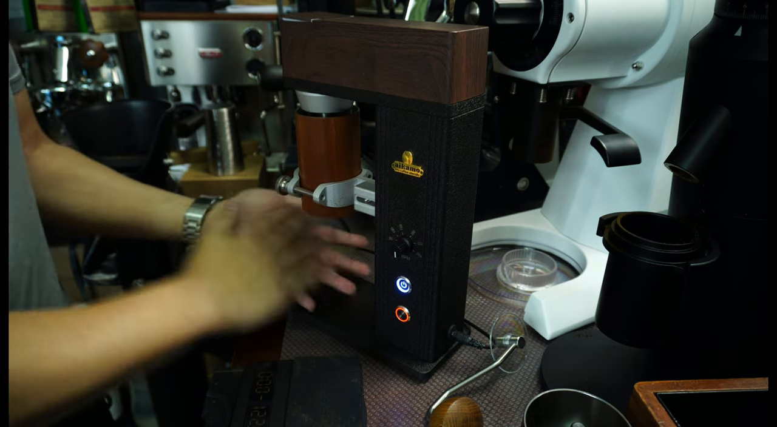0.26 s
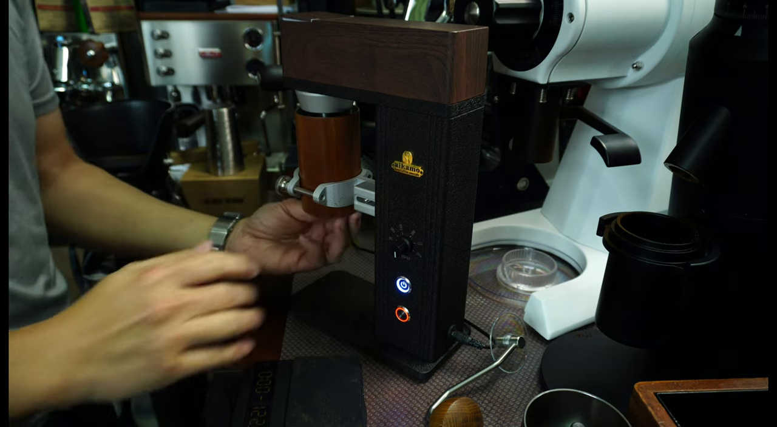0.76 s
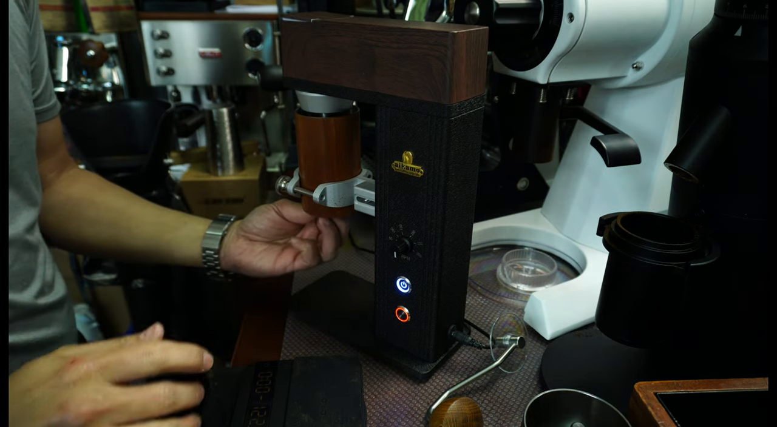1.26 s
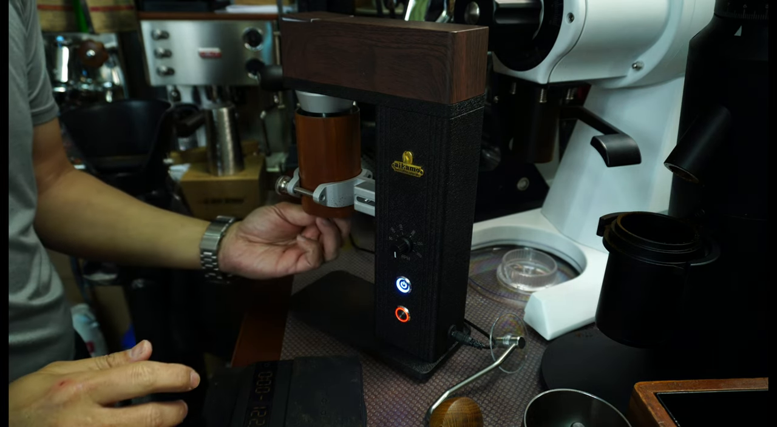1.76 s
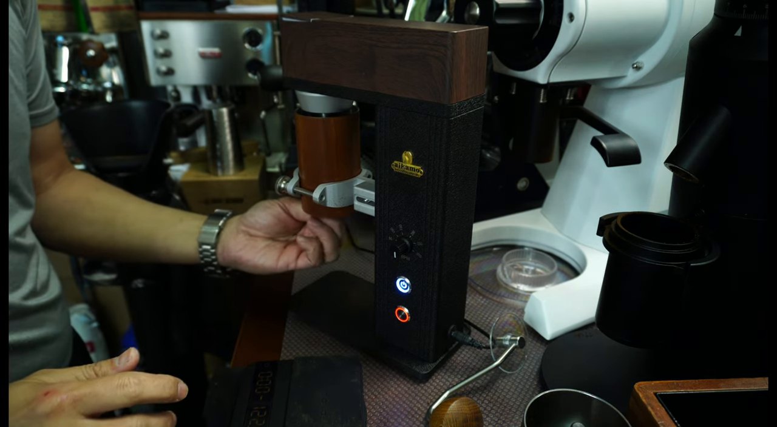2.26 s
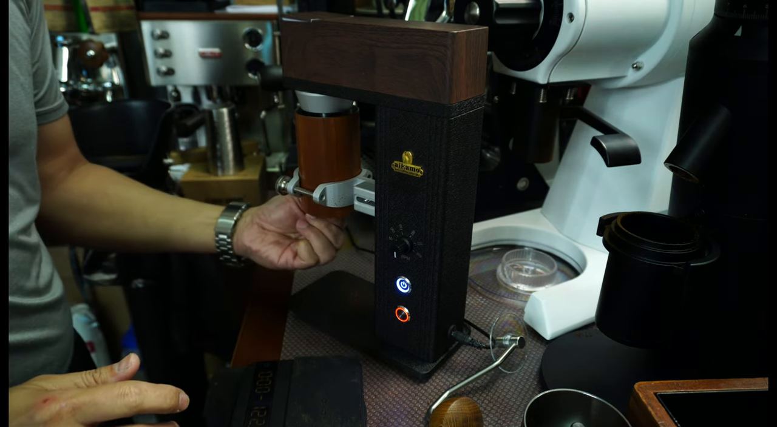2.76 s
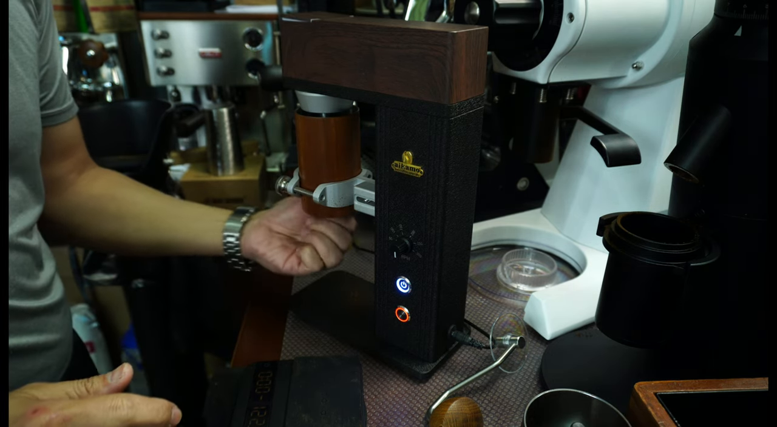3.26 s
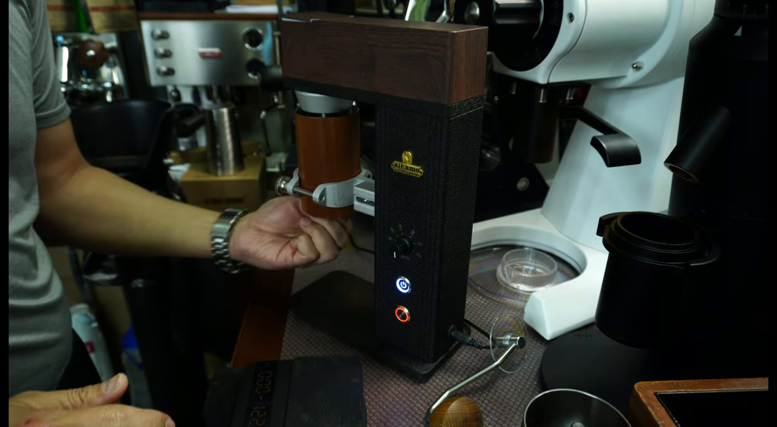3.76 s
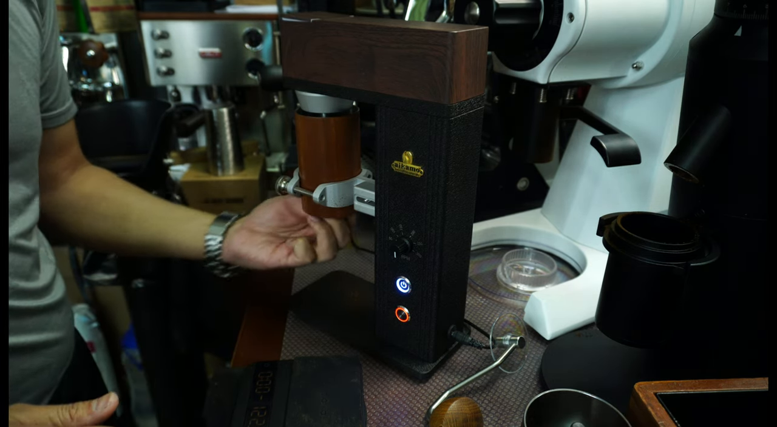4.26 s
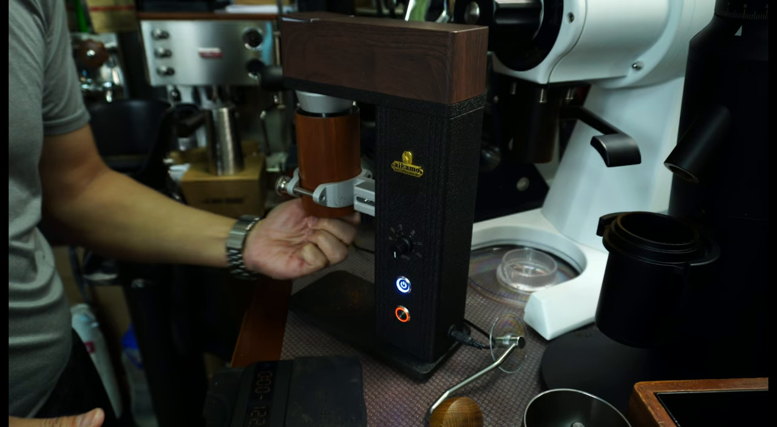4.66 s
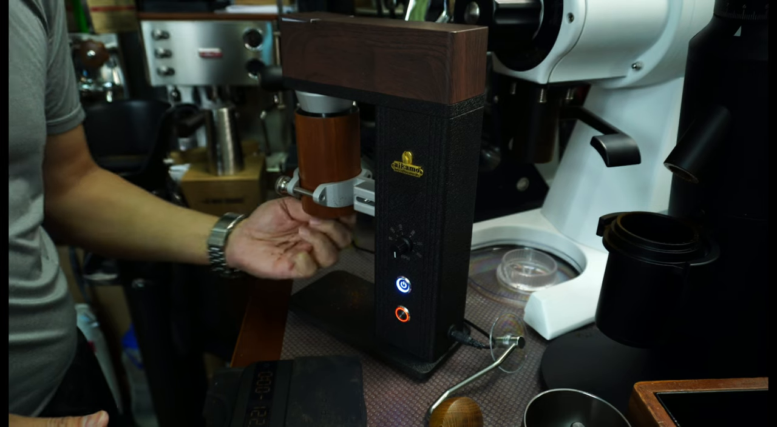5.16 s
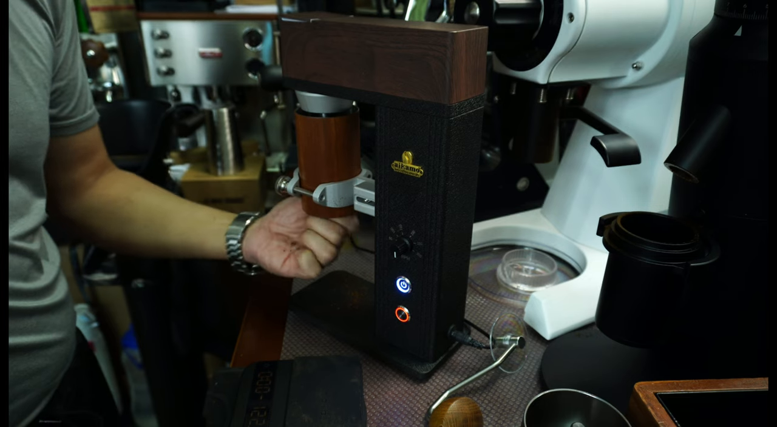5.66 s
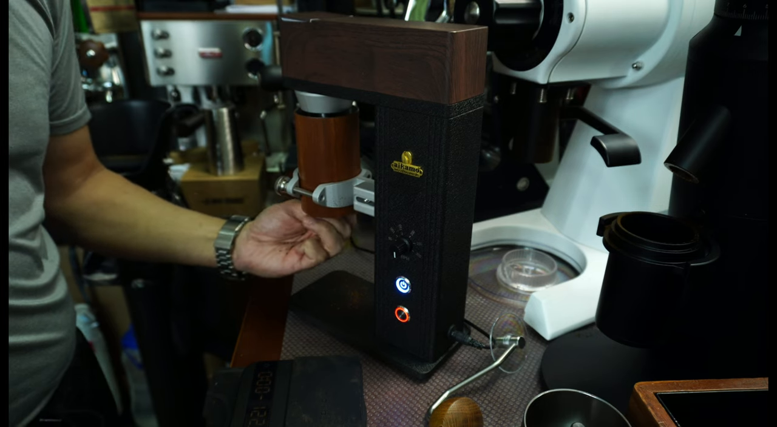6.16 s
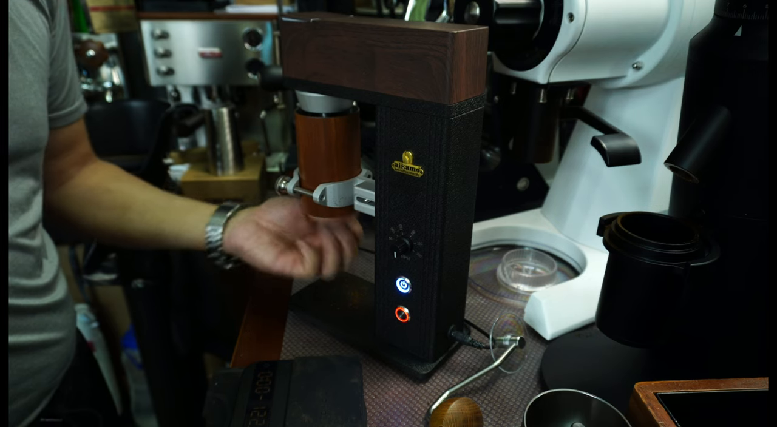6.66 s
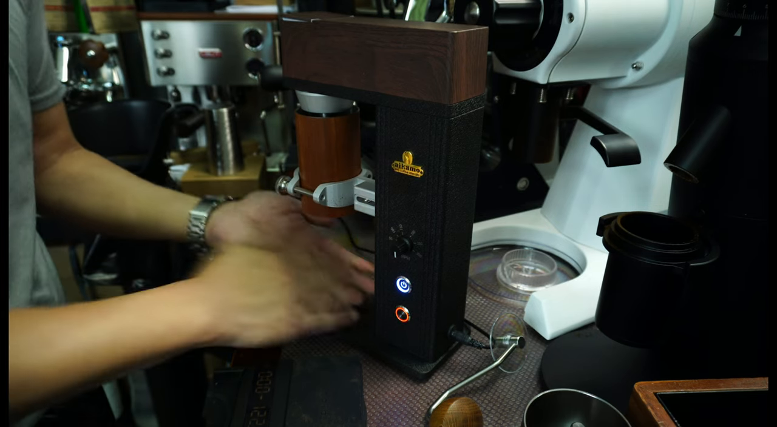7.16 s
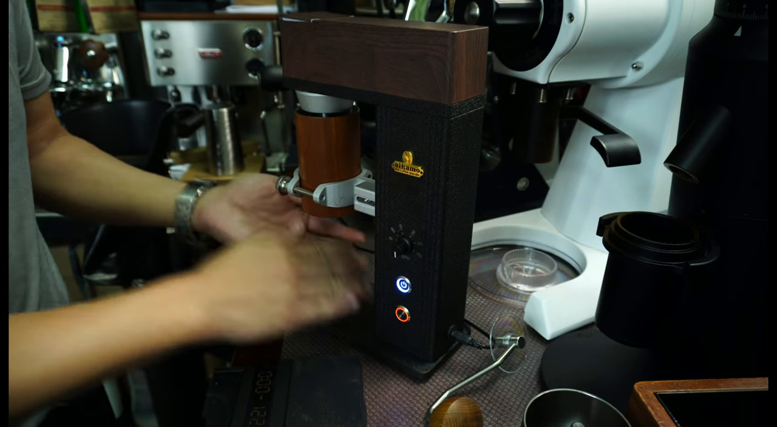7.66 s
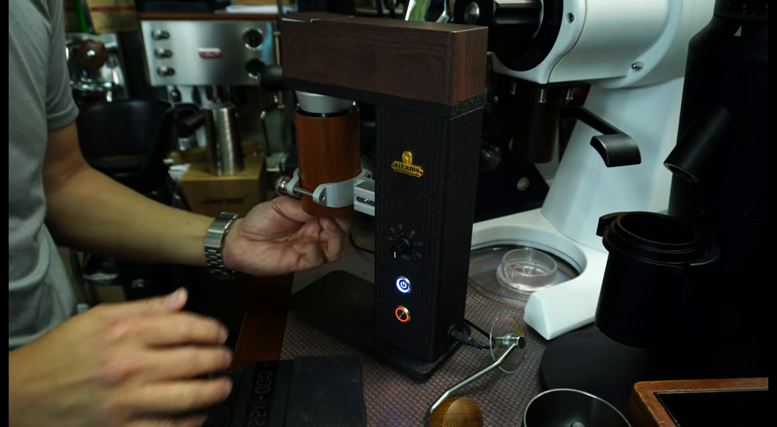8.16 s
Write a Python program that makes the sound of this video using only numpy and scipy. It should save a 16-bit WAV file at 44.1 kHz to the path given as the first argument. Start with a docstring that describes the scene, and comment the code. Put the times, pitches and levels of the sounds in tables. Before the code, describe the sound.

A hand turns the small steel adjustment wheel of a coffee grinder, making a run of sharp, uneven clicks, some bright and ringing, others muffled. The clicking pauses for a dull rustle, a few soft brush strokes and a short hissy tick, then resumes in a longer run with faint rubbing. The sound is close, in a small room with low background hiss.

```python
"""Adjusting a coffee grinder

A hand turns the small steel adjustment wheel on a cluttered counter. Each detent is an impact that excites
the modes of wheel and housing, bright when free, muffled when the fingers damp it; the small room answers.
Fingers tick on the metal. A pause holds a dull rustle, a few brush strokes and one short hissy tick; later
the turning wheel rubs faintly. Room tone lies beneath, and the sound drops out five times a second."""
import sys
import numpy as np
from scipy import signal
from scipy.fft import rfft, irfft, next_fast_len
from scipy.io import wavfile
from scipy.ndimage import uniform_filter1d, map_coordinates

SR = 44100
rng = np.random.default_rng(int(sys.argv[2]) if len(sys.argv) > 2 else 0)


def log_audio(samples):
    """Write samples as a 16-bit WAV file to the path given in sys.argv[1]."""
    # one column per channel
    frames = np.atleast_2d(samples).T
    # limit to full scale, then quantise
    limited = np.clip(frames, -1, 1)
    pcm = np.round(limited * 32767).astype(np.int16)
    wavfile.write(sys.argv[1], SR, pcm)


N = 371763

# Midrange spectrum of the clicks and the rustle: f/Hz, level/dB
MID_SPECTRUM = [(900, -49), (1500, -25.5), (2100, -10.5), (2700, -11), (3500, -13.5), (4300, -11),
                (5000, -12), (5700, -40), (7000, -63)]
# Spectrum of the brushing, rubbing and ticks: f/Hz, level/dB
HISS_SPECTRUM = [(710, -55), (1500, -31), (2500, -7), (3600, -1.5), (4800, 4), (5900, -0.5), (11900, -4),
                 (14800, -7), (16000, -23)]


def amp(db):
    """Amplitude ratio of a level in dB."""
    return 10 ** (np.asarray(db) / 20)


def unit_rms(x):
    """Normalisation to an rms of 1."""
    return x / np.sqrt(np.mean(x ** 2) + 1e-20)


def log_interp(points, hz):
    """Interpolation of (f/Hz, value) points on a logarithmic frequency axis."""
    f, value = np.transpose(points)
    return np.interp(np.log(hz + 1), np.log(f + 1), value)


def filtered(x, response):
    """Linear filtering: the spectrum is multiplied by a frequency response."""
    size = next_fast_len(N + SR // 2)
    return irfft(rfft(x, size) * response(np.fft.rfftfreq(size, 1 / SR)), size)[..., :N]


def white_pair(coherence, size):
    """Partial coherence: left and right are the weighted sum and difference of two white noises."""
    angle = np.arccos(np.clip(coherence, 0, 1)) / 2
    mid, side = rng.standard_normal((2, size)) * [[np.cos(angle)], [np.sin(angle)]]
    return np.array([mid + side, mid - side])


def coloured_pair(spectrum, coherence):
    """Spectrally shaped stereo noise of rms 1, with a coherence given by frequency."""
    angle = lambda hz: np.arccos(np.clip(log_interp(coherence, hz), 0, 1)) / 2
    shape = lambda hz: amp(log_interp(spectrum, hz)) * [np.cos(angle(hz)), np.sin(angle(hz))]
    mid, side = filtered(rng.standard_normal((2, N)), shape)
    return unit_rms(np.array([mid + side, mid - side]))


def room_tone():
    """Background noise: its level drifts slightly and its coherence falls with frequency."""
    # Room tone and hiss: f/Hz, level/dB
    spectrum = [(30, -33), (91, -23.5), (260, -12.5), (690, -4), (1650, -2), (2300, -4), (4500, -7),
                (5400, -11.5), (6300, -10.5), (10000, -18), (14000, -21.5), (14700, -15.5), (15400, -11),
                (15900, -45)]
    # Likeness of left and right: f/Hz, coherence
    coherence = [(60, 0.97), (240, 0.87), (950, 0.8), (3770, 0.54), (15000, 0.039)]
    drift_db = 1.5 * map_coordinates(rng.standard_normal(40), [np.arange(N) * 4 / SR])
    return amp(-65.5 + drift_db) * coloured_pair(spectrum, coherence)


def resonances(modes, f, scatter_db):
    """Modal superposition: damped resonators whose strength and pitch vary from blow to blow."""
    centre, width, db = np.transpose(modes)[..., None]
    centre = centre * (1 + 0.002 * rng.standard_normal(centre.shape))  # the hand's hold detunes them
    polarity = (-1) ** np.arange(len(centre))[:, None]
    gain = polarity * amp(db + scatter_db * rng.standard_normal(centre.shape))
    return np.sum(gain * 1j * f * width / (centre ** 2 - f ** 2 + 1j * f * width), axis=0)


def detent_impact(t, grip, room_db, snap_t60, room_t60, coherence, attack_s):
    """Impact and reflection: spectra of the near sound (direct plus clutter) and the reverberation."""
    after = np.maximum(t, 0)
    rise = lambda age, tau: 1 - np.exp(-age / tau)
    crack = lambda age: amp(0.5 - 60 * (age / 0.01) ** 2) * rise(age, attack_s)
    scrape = amp(-10 - 12 * grip + 2070 * t) * (t < 0)  # the detent rides up the tooth
    snap = amp(-2.5 - 60 * after / snap_t60) * rise(after, attack_s)
    rebound = grip * amp(-3) * crack(np.maximum(t - 0.0038, 0))  # a gripped detent lands twice
    clutter = amp(-10.5 - 60 * after / 0.098) * rise(after, 0.0032)
    room = amp(room_db - 60 * after / room_t60) * rise(after, 0.0025)
    direct = white_pair(coherence, len(t)) * (scrape + snap + crack(after) + rebound)
    early = white_pair(coherence * 1.6, len(t)) * clutter
    return rfft(direct + early), rfft(white_pair(coherence ** 2, len(t)) * room)


def steel_response(near, far, ring, blow):
    """Impulse excitation: one clean blow starts the modes, which also colour the reverberation."""
    strength = np.sqrt(np.mean(np.abs(near) ** 2))
    spectrum = 1.036 * near + strength * blow * ring + far * (1.89 + 0.28 * ring)
    return spectrum * amp([[0.6], [-0.6]])  # a little to the left


def wheel_clicks():
    """Impact excitation: each detent sounds in the steel's midrange and treble and knocks the housing."""
    # Detents: t/s, level/dB, relative treble level/dB, weight (extra housing knock)/dB
    clicks = [(0.083, -18.5, -14, -1), (0.1495, -14.5, -13, -2.5), (0.191, -19.5, -11, 3),
              (0.314, -33, -17.5, -0.5), (0.4122, -38, -16, 6), (0.427, -23.5, -20, -5),
              (0.5227, -22, -35, 1), (0.8003, -42.5, -18, 13.5), (0.8323, -18, -11.5, 5),
              (0.8696, -18, -5.5, -6.5), (0.9682, -29, -15, 5), (1.1732, -40.5, -15.5, 6),
              (1.2054, -22.5, -35.5, 0), (1.5349, -38, -25.5, 2.5), (1.5822, -35, -44, 11),
              (1.6481, -25, -7.5, 4.5), (1.7429, -20.5, -13.5, -3), (1.8385, -25.5, -10.5, 1),
              (1.9147, -26, -16, 0), (2.0553, -25, -33.5, -1.5), (3.7898, -22, -11, -4.5),
              (3.883, -35, -16, 8.5), (3.9141, -39.5, -8.5, -1), (3.9576, -36.5, -15.5, -2),
              (4.0797, -22.5, -13, -1), (4.0986, -35, -12, 3.5), (4.1872, -14.5, -15.5, -8.5),
              (4.343, -23.5, -39, 0), (4.471, -49, -15, -5), (4.5114, -44, -29, 1), (4.552, -35, -51, 4),
              (4.6098, -14, -15.5, -5.5), (4.6887, -16.5, -16, -3), (4.735, -36, -16, 5),
              (4.748, -28.5, -14, 2), (4.8485, -30.5, -20.5, 5.5), (5.011, -27.5, -56, 2.5),
              (5.205, -32, -48, 4), (5.2564, -15.5, -9, -1.5), (5.334, -21, -14.5, -0.5),
              (5.4009, -24, -14.5, -6.5), (5.409, -22, -13, -0.5), (5.4937, -24, -20.5, -4.5),
              (5.6052, -43, -22, 8.5), (5.6274, -20, -31.5, -0.5), (5.7703, -42.5, -29.5, 2),
              (5.817, -33, -43, 8.5), (5.8646, -17.5, -13, -1.5), (5.9817, -31.5, -15, 4.5),
              (5.9988, -33.5, -13, 3), (6.054, -26, -17, 1), (6.2015, -24, -34, 0), (6.268, -43, -16, -1),
              (6.4297, -31.5, -58, 5), (6.4997, -21.5, -15.5, -4), (6.5357, -28, -15, 0.5),
              (6.6328, -29, -13.5, 0), (6.7528, -33.5, -12.5, 3), (6.78, -41, -21, -2),
              (6.8652, -41.5, -28.5, 8), (6.901, -30.5, -18, -1.5), (6.9685, -23, -51, 1),
              (7.158, -40.5, -25.5, 0), (7.1786, -31.5, -50, 9), (7.2582, -16.5, -18.5, -7.5),
              (7.3117, -35.5, -16, 6), (7.328, -41, -20, 6.5), (7.403, -36.5, -12.5, 5),
              (7.435, -46, -30, -1), (7.5125, -43, -23, 5), (7.5312, -29, -20.5, -2),
              (7.698, -28, -36, 0.5), (7.871, -46, -26, 6), (7.8993, -31, -47, 4.5),
              (7.953, -24, -16.5, 5.5), (8.003, -27, -22, -6), (8.01, -22, -19, -4), (8.195, -31, -12.5, 1)]
    # Modes of the steel wheel and of the housing: f/Hz, bandwidth/Hz, level/dB
    wheel_modes = [(2026, 16, 1.5), (2283, 26, 4), (2664, 15, 6.5), (3258, 28, 11.5), (3786, 88, -0.5),
                   (4154, 65, 7.5), (4250, 380, 5), (4560, 34, 7), (4780, 18, 1), (6020, 13, -1.5),
                   (7540, 30, -10), (7550, 28, -1.5)]
    housing_modes = [(190, 167, -19), (322, 50, -13.5), (459, 73.5, -6), (1039, 67, 0), (1205, 150, -3.5),
                     (1620, 615, -7.5)]
    # Treble band of a click: f/Hz, level/dB
    treble_spectrum = [(4000, -24), (5500, 5), (7500, 1), (9500, -6.5), (11000, -10.5), (14000, -16),
                       (16500, -25)]
    # Added slope above top_hz: t/s, slope/(dB per octave)
    top_slopes = [(0, 4), (2, 0), (3.8, -7), (5.5, 1), (7, -10), (8.4, -1)]
    top_hz, pivot_hz, hump_width_hz = 8140, 3000, 703
    size, lead = 2 ** 14, SR // 50
    t, f = (np.arange(size) - lead) / SR, np.fft.rfftfreq(size, 1 / SR)
    delay = lambda seconds: np.exp(-2j * np.pi * f * seconds)
    blow = delay(lead / SR + 0.0015)  # the detent bottoms out just after the snap begins
    radiation = 1 / (1 + (140 / (f + 1)) ** 2)  # too small a box to radiate bass
    mid_band, treble_band = amp(log_interp(MID_SPECTRUM, f)), amp(log_interp(treble_spectrum, f))
    out = np.zeros((2, N + size))
    for onset, db, treble_db, weight_db in clicks:
        grip = np.clip((-23.5 - treble_db) / 17, 0, 1)  # 0 free and bright, 1 gripped and dull
        knock_db = -49.5 + 0.9 * (db + 25) - 7.5 * grip + weight_db
        room_db = -19.5 + 0.5 * rng.standard_normal()
        ring = resonances(wheel_modes, f, scatter_db=3) * amp(0.5 * grip)
        humps = map_coordinates(rng.standard_normal(80), [np.minimum(f / hump_width_hz, 79)])
        tooth_colour = amp(2 * (1 - grip) * humps)
        mid_tilt = amp(-0.69 * weight_db * np.log2(np.maximum(f / pivot_hz, 0.5)))  # heavy is darker
        top_slope = np.interp(onset, *np.transpose(top_slopes))
        top_tilt = amp(top_slope * np.log2(np.maximum(f / top_hz, 1)))
        mid = detent_impact(t, grip, room_db,
                            snap_t60=0.018, room_t60=0.46, coherence=0.92, attack_s=0.00049)
        treble = detent_impact(t, grip, room_db + 4,
                               snap_t60=0.029, room_t60=0.34, coherence=0.77, attack_s=0.00023)
        knock = detent_impact(t, grip, room_db + 6,
                              snap_t60=0.04, room_t60=0.49, coherence=0.985, attack_s=0.0023)
        housing = resonances(housing_modes, f, scatter_db=2.5) * radiation
        bands = irfft([steel_response(*mid, ring, blow) * mid_band * mid_tilt * tooth_colour,
                       steel_response(*treble, ring, blow) * treble_band * top_tilt * tooth_colour,
                       sum(knock) * housing * delay(0.003 * (1 - grip))])  # a free housing lags
        onset_rms = np.sqrt(np.mean(bands[..., lead:lead + SR // 100] ** 2, axis=(1, 2)))  # first 10 ms
        gains = amp([db - 13, db + treble_db - 4, knock_db]) / onset_rms
        start = round(onset * SR) - lead
        out[:, start:start + size] += np.tensordot(gains, bands, 1)
    return out[:, :N]


def finger_ticks(count=40):
    """Light impacts of fingers on metal: exponentially decaying noise bursts at random moments."""
    when, softness = rng.random((count, 2)).T
    impulses = np.zeros(N)
    impulses[(when * N).astype(int)] = amp(-66 - 2.5 * np.log(softness + 0.01))
    decay = amp(-60 * np.arange(SR // 20) / SR / 0.086)
    envelope = np.abs(signal.fftconvolve(impulses, decay)[:N])
    return envelope * coloured_pair(HISS_SPECTRUM, coherence=[(3000, 0.54)])


def rustle(centre_s=2.174, half_width_s=0.14):
    """Amplitude modulation: dull noise swells under a Gaussian envelope as the first turn ends."""
    swell = np.exp(-((np.arange(N) / SR - centre_s) / half_width_s) ** 2)
    return amp(-64.5) * swell * coloured_pair(MID_SPECTRUM, coherence=[(3000, 0.77)])


def hiss_swells():
    """Modulated grainy noise: brush strokes, one short hissy tick, faint rubbing as the wheel turns."""
    # Five brush strokes, the tick, the rubbing: start t/s, loudest t/s, end t/s, level/dB
    swells = [(2.427, 2.436, 2.49, -43.5), (2.463, 2.58, 2.657, -44.5), (2.756, 2.793, 2.893, -48),
              (2.947, 3.007, 3.104, -46.5), (3.112, 3.13, 3.17, -64), (3.34, 3.356, 3.36, -53.5),
              (5.3, 5.502, 5.71, -59)]
    t = np.arange(N) / SR
    swell = np.zeros(N)
    for start, loudest, end, db in swells:
        progress = np.interp(t, [start, loudest, end], [-1, 0, 1], left=-3, right=3)
        swell += amp(db - 20 * np.abs(progress) ** 1.35)
    tail = amp(-60 * t[:SR // 4] / 1.7)  # the room lets each swell linger
    lingering = amp(-12) * signal.fftconvolve(swell, tail / tail.sum())[:N]
    envelope = np.hypot(uniform_filter1d(swell, size=200), lingering)
    grain = amp(unit_rms(uniform_filter1d(rng.standard_normal(N), size=40)))
    hiss = coloured_pair(HISS_SPECTRUM, coherence=[(3000, 1.0), (12000, 0.46)])
    return envelope * unit_rms(grain * hiss) * amp([[0.3], [-0.3]])  # a little to the left


def scene():
    """Superposition: the sound pressures of the five layers add."""
    return wheel_clicks() + hiss_swells() + finger_ticks() + rustle() + room_tone()


def record(dry):
    """Periodic gating and a steep low-pass; in runs of three, every second dropout is longer and deeper."""
    # End of the first long dropout of each run: t/s
    long_runs = [.3125, 2.1125, 3.5125, 4.9125, 6.7125, 8.1125]
    period_s, first_end_s, cutoff_hz = 0.2, 0.1125, 15900
    short_s, short_db, long_s, long_db = 0.0078, -17.5, 0.0178, -26
    t = np.arange(N) / SR
    gain_db = np.where((first_end_s - t) % period_s < short_s, short_db, 0.0)
    for end in np.add.outer(long_runs, 2 * period_s * np.arange(3)).ravel():
        gain_db[(t > end - long_s) & (t < end)] = long_db
    gain = uniform_filter1d(amp(gain_db), size=24)
    return filtered(dry * gain, lambda hz: 1 / (1 + (hz / cutoff_hz) ** 90))


dry = scene()
out = record(dry)
log_audio(out)
```